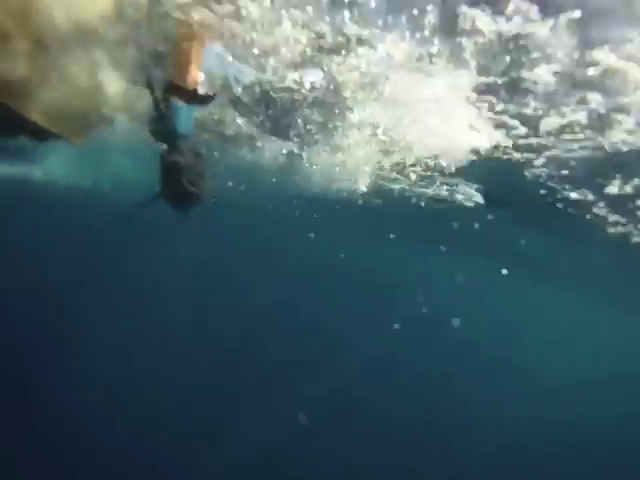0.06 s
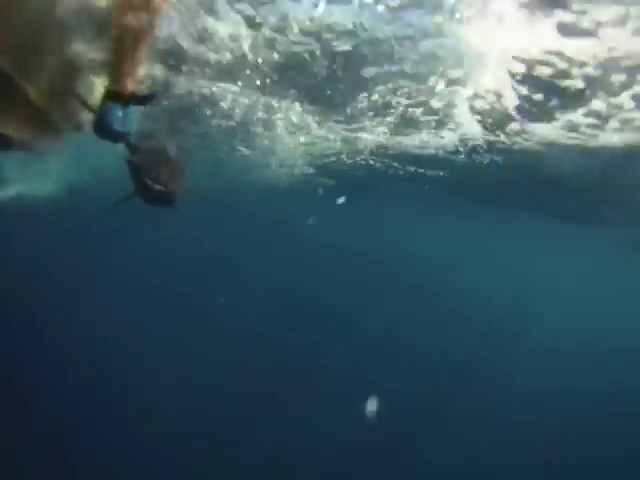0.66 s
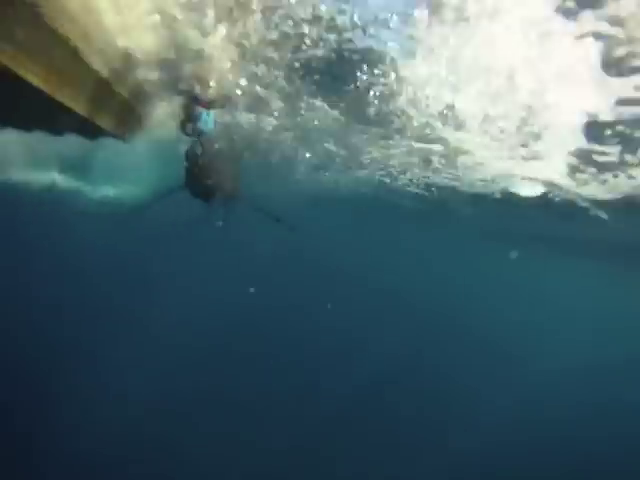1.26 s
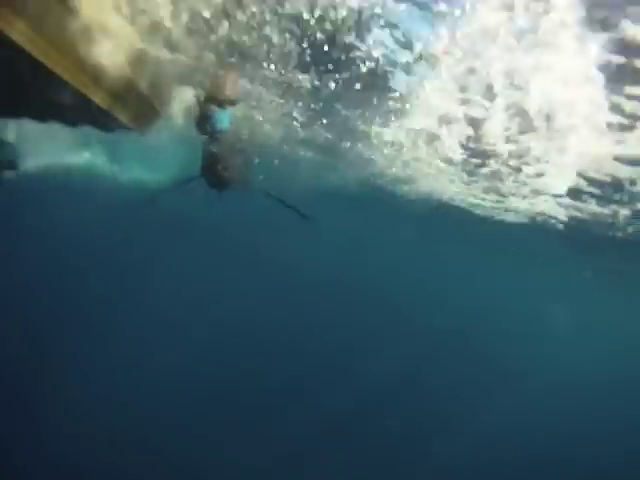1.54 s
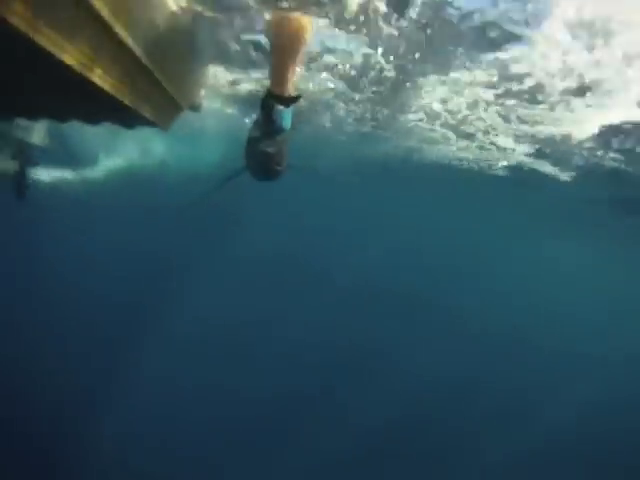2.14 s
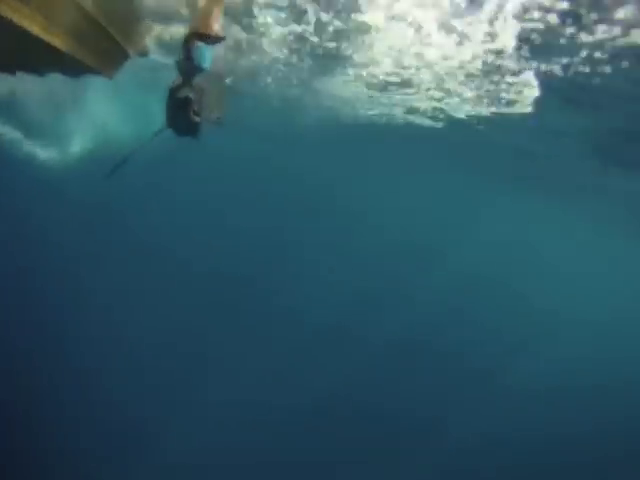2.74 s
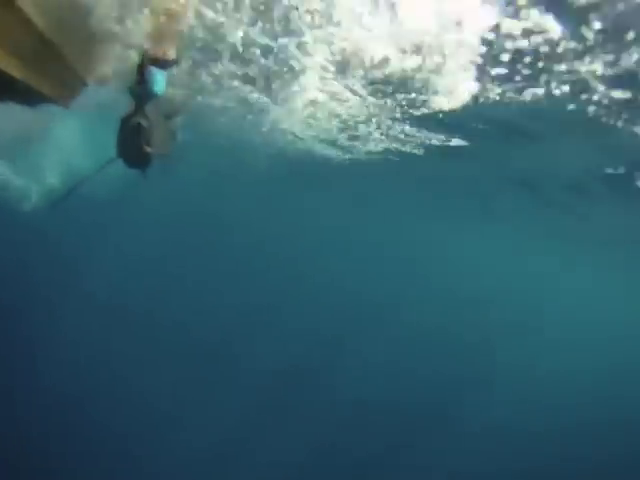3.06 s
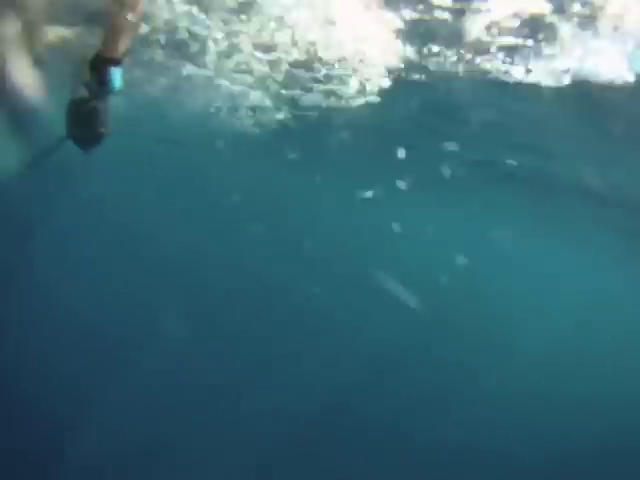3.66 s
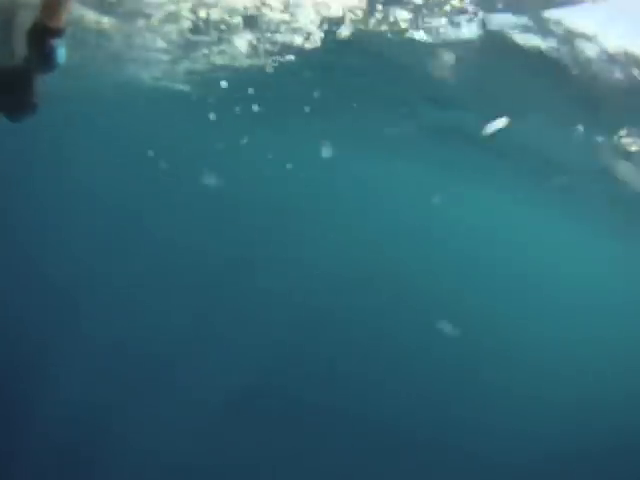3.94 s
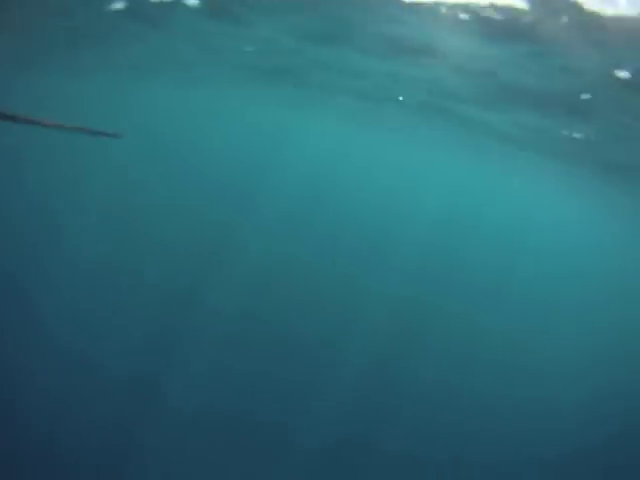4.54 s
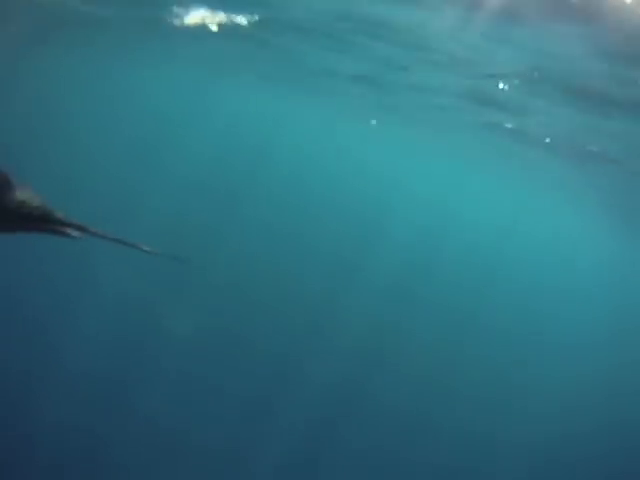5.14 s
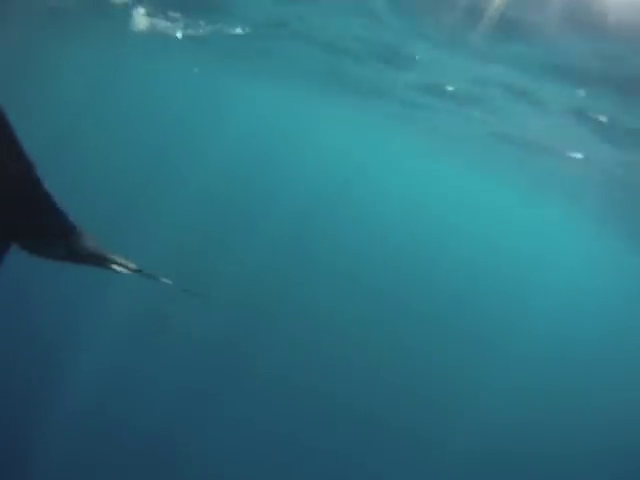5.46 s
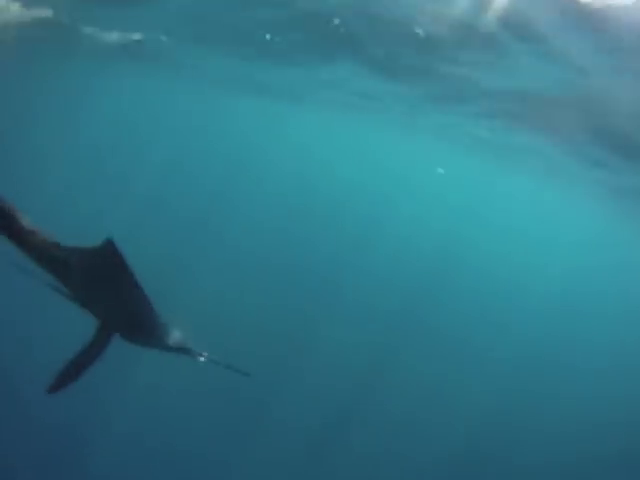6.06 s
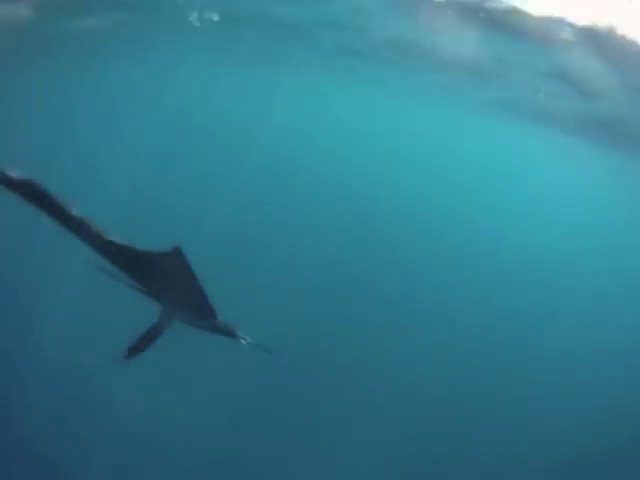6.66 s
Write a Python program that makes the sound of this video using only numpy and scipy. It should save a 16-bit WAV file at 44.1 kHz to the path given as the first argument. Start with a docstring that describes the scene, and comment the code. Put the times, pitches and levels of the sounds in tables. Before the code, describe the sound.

The sound is heard under water beside a moving boat, close and muffled by a camera housing. A continuous gurgle of churned bubbles with a thin fizz runs over a low, wavering engine throb and the rumble of streaming water. The first 0.6 seconds are the busiest, with bright froth, sharp crackles, small pings and several round bloops from large air pockets. The bubbling then eases, with a few more bloops between 1 and 1.6 seconds and a calmer stretch until about 2.8. The engine booms slightly near 0.9, 2 and 2.9 seconds. A run of bloops follows from 2.8 to 4 seconds, and the gurgle surges at 3.5. From 4 seconds everything gradually fades, with a strong bloop and crackles near 4.8, a brief swell with a sharp ping at 5.6, and faint last bloops before silence at about 6.7 seconds.

```python
"""A churn of bubbles, heard under water beside a moving boat. Each bubble is a resonator, a spring of air
loaded by water: the wake gurgles and froths, small bubbles ping and crackle near the camera housing,
and large air pockets bloop over the throb of the engine and the rumble of the stream.
The camera ducks after each big bloop and holds its samples at a low rate, which adds a thin fizz on top;
the sound fades out at the end."""
import sys
import numpy as np
from scipy import signal
from scipy.fft import rfft, irfft
from scipy.io import wavfile

SR = 44100
rng = np.random.default_rng(int(sys.argv[2]) if len(sys.argv) > 2 else 0)


def log_audio(samples):
    """Write samples as a 16-bit WAV file to the path given in sys.argv[1]."""
    # one column per channel
    frames = np.atleast_2d(samples).T
    # limit to full scale, then quantise
    limited = np.clip(frames, -1, 1)
    pcm = np.round(limited * 32767).astype(np.int16)
    wavfile.write(sys.argv[1], SR, pcm)


N = 299791
TIME = np.arange(N) / SR

# the wake swells and eases: t/s, gurgle level/dB, froth level/dB
WAKE_LEVELS = [(0.0, -16, -21), (0.1, -19.5, -18.5), (0.33, -19, -28), (0.7, -22, -29.5), (1.1, -25, -35),
               (1.6, -27.5, -34), (1.8, -24.5, -34), (2.3, -25, -32), (2.8, -25.5, -32.5),
               (3.3, -23, -32.5), (3.52, -16, -28.5), (3.63, -23.5, -31.5), (3.72, -21, -28),
               (4.3, -21.5, -33.5), (5.3, -27, -33.5), (5.6, -19.5, -27), (5.75, -23.5, -35),
               (6.5, -23.5, -33)]


def gain_of(db):
    """Amplitude ratio: a factor of ten for every 20 dB."""
    return 10 ** (np.asarray(db) / 20)


def unit_rms(x):
    """Normalisation to a mean square of 1."""
    return x / np.sqrt(np.mean(x ** 2) + 1e-20)


def curve(rows, column):
    """Linear interpolation of one column of a time table, at every sample."""
    rows = np.asarray(rows)
    return np.interp(TIME, rows[:, 0], rows[:, column])


def add(mix, start_s, sound):
    """Superposition: a sound adds to the mix from start_s on."""
    part = mix[max(round(start_s * SR), 0):][:len(sound)]
    part += sound[:len(part)]


def wander(rate_hz):
    """Random fluctuation of rms 1: noise low-passed at rate_hz."""
    hz = np.fft.rfftfreq(N, 1 / SR)
    return unit_rms(irfft(rfft(rng.standard_normal(N)) / (1 + (hz / rate_hz) ** 4), N))


def coloured(x, spectrum, size=2 ** 13):
    """Minimum-phase filtering imposes a spectral shape; the result has rms 1."""
    hz, db = np.transpose(spectrum)
    bin_hz = abs(np.fft.fftfreq(size, 1 / SR))
    log_gain = np.log(gain_of(np.interp(np.log(bin_hz + 1), np.log(hz), db)))
    response = np.exp(np.conj(signal.hilbert(log_gain)))
    taps = np.fft.ifft(response).real[:size // 2]
    return unit_rms(signal.oaconvolve(x, taps)[:N])


def bubble(hz, t60_s, rise_s, glide):
    """Damped oscillator: a pocket of air rings, its pitch climbing as it nears the surface."""
    t = np.arange(0, t60_s + rise_s, 1 / SR)
    swell = np.sin(np.pi / 2 * np.minimum(t / rise_s, 1)) ** 2
    decay = np.exp(-np.log(1000) * np.maximum(t - rise_s, 0) / t60_s)
    return swell * decay * np.sin(2 * np.pi * hz * t * (1 + glide * t / t60_s))


def swarm(low_hz, high_hz, per_s, cycles, spread_db, glide, sizes):
    """Shot noise: bubbles of many sizes are born at random moments, most faint, a few strong."""
    out = np.zeros(N)
    for hz in np.linspace(low_hz, high_hz, sizes):
        ring = bubble(hz, cycles * rng.uniform(0.5, 3.43) / hz, 1 / hz, glide)
        strength = gain_of(spread_db * np.minimum(rng.exponential(1, N), 4))
        births = strength * (rng.random(N) < per_s / sizes / SR)
        out += signal.oaconvolve(births, ring / np.linalg.norm(ring))[:N]
    return out


def rumble(level_db=-27.5, eddy_db=2.5, eddy_hz=2.7):
    """Flow noise: the pressure fluctuates as water streams past the housing in eddies."""
    # the stream heard through the housing: f/Hz, relative level/dB
    flow_spectrum = [(8, -49), (20, 9.5), (40, 4.5), (90, 5.5), (125, -1.5), (165, -8.5), (260, -12),
                     (400, -48.5)]
    flow = coloured(rng.standard_normal(N), flow_spectrum)
    return flow * gain_of(level_db + eddy_db * wander(eddy_hz))


def engine(sway_db=2.5, sway_hz=4):
    """Periodic firing gives a harmonic series: three strong low orders, weaker ones wavering above."""
    # firing rate: t/s, f/Hz
    firing_rate = [(0.0, 36.3), (0.05, 36.99), (2.89, 35.46), (2.96, 36.24), (4.71, 36.54), (5.11, 37.54),
                   (6.26, 35.23), (6.4, 35.7)]
    # two orders boom and recede as the hull rolls: t/s, order 2 rms level/dB, order 3 rms level/dB
    booming_orders = [(0.3, -34.5, -31.5), (0.85, -23, -19), (1.3, -28.5, -30.5), (1.8, -39, -34.5),
                      (2.05, -37, -21), (2.5, -28, -25.5), (2.88, -32, -17.5), (3.05, -27, -41.5),
                      (3.7, -26, -27.5), (5.1, -25, -31), (5.9, -34, -30.5), (6.5, -32, -24.5)]
    # the others sway at random: multiple of the firing rate, rms level/dB
    swaying_orders = [(1, -28.5), (4, -45.5), (5, -53.5), (6, -48.5), (7, -48), (8, -43.5), (9, -38),
                      (10, -34), (11, -40), (12, -45)]
    firing_hz = curve(firing_rate, column=1) * (1 + 0.00384 * wander(5.56))
    firings = np.cumsum(firing_hz) / SR
    levels = [(order, curve(booming_orders, column=order - 1)) for order in (2, 3)]
    levels += [(order, db + sway_db * wander(sway_hz)) for order, db in swaying_orders]
    out = np.zeros(N)
    for order, db in levels:
        drift = 0.01 * order * wander(8.1)  # bubble clouds keep changing the path through the water
        phase = 2 * np.pi * (order * firings + drift + rng.random())
        out += np.sqrt(2) * gain_of(db) * np.sin(phase)
    return out


def gurgle(gulp_db=1.64):
    """Large bubbles resonate low; the wake sheds them in gulps that modulate the level."""
    # large bubbles heard through the housing: f/Hz, relative level/dB
    gurgle_spectrum = [(150, -28.5), (250, -16), (330, -4), (420, -2.5), (600, 1), (690, -6.5), (770, -2),
                       (870, -16), (1000, -19), (1300, -43.5)]
    bubbles = swarm(235.3, 893.2, per_s=900, cycles=19, spread_db=3.5, glide=0.071, sizes=36)
    gulps = unit_rms(gain_of(gulp_db * wander(25)))
    return coloured(bubbles, gurgle_spectrum) * gulps * gain_of(curve(WAKE_LEVELS, column=1))


def froth(clump_db=2.43):
    """Small bubbles resonate high, in quick clumps; harder churning also whips up a fine spray."""
    # white water heard through the housing: f/Hz, relative level/dB
    froth_spectrum = [(700, -41.5), (990, -9.5), (1170, 5), (1370, -7.5), (1490, -1.5), (1620, -7),
                      (1820, -3), (2330, 1), (2750, -14.5), (3250, -26), (3750, -20), (4400, -31.5),
                      (5400, -34), (6000, -38)]
    # ticks and spray heard through the housing: f/Hz, relative level/dB
    fine_spectrum = [(2500, -19.5), (3600, 3.5), (4400, -11.5), (5300, -7.5), (6000, -12.5)]
    level_db = curve(WAKE_LEVELS, column=2)
    bubbles = swarm(893.7, 5760, per_s=5000, cycles=30, spread_db=4.5, glide=0.02, sizes=64)
    ticks = swarm(2700, 5700, per_s=56, cycles=32, spread_db=3.3, glide=0.051, sizes=20)
    spray = swarm(2400, 4600, per_s=990, cycles=36, spread_db=4.5, glide=0.03, sizes=24)
    clumps = unit_rms(gain_of(clump_db * wander(25)))
    white_water = coloured(bubbles, froth_spectrum) * clumps
    spray_gain = gain_of(-28 + np.minimum(0.38 * (level_db - np.median(level_db)), 11))
    fine = gain_of(-21) * coloured(ticks, fine_spectrum) + spray_gain * coloured(spray, fine_spectrum)
    return (white_water + fine) * gain_of(level_db)


def pings(cycles=55, stray_vs_froth_db=-10.5):
    """Light damping lets small bubbles ring for dozens of cycles: faint strays, and a few close by."""
    # single close bubbles: t/s, peak level/dB, f/Hz
    close_bubbles = [(0.013, -6.5, 1780), (0.046, -10.5, 1360), (0.052, -8, 1990), (0.564, -8.5, 2085),
                     (1.791, -14.5, 1210), (2.321, -13, 1187), (3.053, -14.5, 1110), (3.848, -12, 2285),
                     (5.609, -2.5, 2120)]
    strays = swarm(1100, 2800, per_s=30, cycles=cycles, spread_db=6, glide=0.091, sizes=24)
    out = unit_rms(strays) * gain_of(stray_vs_froth_db + curve(WAKE_LEVELS, column=2))
    for s, db, hz in close_bubbles:
        add(out, s - 0.001, gain_of(db) * bubble(hz, cycles / hz, rise_s=0.002, glide=0.039))
    return out


def crackles(window_s=0.006, scatter_octaves=0.31, cycles=20, count=9):
    """Tiny bubbles of scattered pitch, born within milliseconds, superpose into one sharp transient."""
    # bursts close to the housing: t/s, level/dB, centre f/Hz
    bursts = [(0.05, -11, 1900), (0.068, -16, 3260), (0.087, -4, 2120), (0.106, -7, 3100),
              (0.227, -7, 2200), (0.490, -6.5, 2510), (0.567, -9, 2000), (1.59, -12.5, 2510),
              (1.689, -20, 2880), (3.36, -18.5, 2890), (3.528, -11, 2100), (3.712, -16, 2160),
              (4.2, -13.5, 2300), (4.721, -5, 2290), (4.740, -12.5, 2400), (4.816, -6.5, 1309),
              (4.939, -16.5, 2820), (5.202, -16, 3042), (5.323, -15, 2530), (5.593, -2, 2142),
              (5.802, -8.5, 3200), (6.145, -18.5, 2520), (6.265, -23, 3220)]
    out = np.zeros(N)
    for s, db, centre_hz in bursts:
        for octaves in np.linspace(-1.5, 1.5, count) * scatter_octaves:
            hz = centre_hz * 2 ** octaves
            pop = bubble(hz * rng.uniform(0.948, 1.016), cycles / hz, rise_s=1 / hz, glide=0.048)
            weight = np.exp(-(octaves / scatter_octaves) ** 2 / 2) / np.sqrt(count / 2)
            add(out, s - 0.001 + window_s * rng.random(), gain_of(db) * weight * pop)
    return out


def bloops(rise_s=0.00314, muffle_hz=900):
    """Pinch-off excites the volume resonance of a large air pocket; the housing acts as a low-pass."""
    # large air pockets: t/s, peak level before muffling/dB, f/Hz
    pockets = [(0.135, -6.5, 553), (0.211, -0.5, 550), (0.344, 3.5, 575), (0.4505, 0.5, 467),
               (0.4555, -3, 402), (1.061, -5, 588), (1.123, -11, 526), (1.249, 1, 537), (1.418, -7, 560),
               (1.605, -9, 750), (2.236, -10, 594), (2.808, -6.5, 528), (2.881, -12, 697),
               (2.943, -8.5, 734), (2.98, -9.5, 642), (3.078, 1.5, 617), (3.179, -1, 556), (3.346, -7, 550),
               (3.4465, -7.5, 606), (3.564, -6, 562), (3.8385, -11, 592), (3.856, -2, 540),
               (3.973, 2.5, 599), (4.0574, -11.5, 549), (4.3685, -0.5, 418), (4.770, 5.5, 560),
               (5.225, 0.7, 716), (5.834, -0.5, 526), (5.950, 1, 586), (6.129, -7, 515), (6.428, -0.5, 627)]
    quiver_db, quiver_s = -19, 0.00914  # the pocket quivers as its neck narrows
    shed_count, shed_db, shed_window_s, shed_octaves = 4, -19.5, 0.029, 0.2  # bubbles torn off it
    out = np.zeros(N)
    for s, db, hz in pockets:
        quiver = bubble(hz, t60_s=0.03, rise_s=quiver_s, glide=0.011)
        add(out, s - quiver_s - 0.002, gain_of(db + quiver_db) * quiver)
        ring = bubble(hz, t60_s=0.043, rise_s=rise_s, glide=0.014)
        add(out, s - 0.001, gain_of(db) * ring)
        for when, pitch in rng.random((shed_count, 2)):
            shed_hz = hz * 2 ** (shed_octaves * (2 * pitch - 1))
            shed = bubble(shed_hz, t60_s=0.053, rise_s=rise_s, glide=0.043)
            add(out, s + rise_s + shed_window_s * when, gain_of(db + shed_db) * shed)
    return signal.sosfiltfilt(signal.butter(6, muffle_hz, fs=SR, output="sos"), out)


def scene():
    """The pressures of bubbles, engine and stream add linearly at one microphone."""
    return (gurgle() + froth() + bloops() + pings() + crackles() + engine() + rumble())[None]


def gain_control(x, threshold_db=-6.5, depth=1.09, recover_db_per_s=75, attack_s=0.0036):
    """Compression: peaks over the threshold pull the gain down within milliseconds; it creeps back."""
    peak_db = 20 * np.log10(abs(x) + 1e-9)
    fall_db = TIME * recover_db_per_s
    held_db = np.maximum.accumulate(peak_db + fall_db) - fall_db
    excess_db = np.maximum(held_db - threshold_db, 0)
    lag = np.exp(-1 / (attack_s * SR))
    cut_db = signal.lfilter([1 - lag], [1, -lag], depth * excess_db)
    return x * gain_of(-cut_db)


def sample_and_hold(x, hold_hz=12000, oversample=4):
    """Spectral imaging: stair steps at a low sample rate mirror the sound faintly around that rate."""
    steps = np.repeat(signal.resample_poly(x, hold_hz, SR), oversample)
    return signal.resample_poly(steps, SR, oversample * hold_hz)[:N]


def record(dry, ceiling=0.93, fade_start_s=3.99, silent_s=6.652, edge_hz=15200):
    """The camera's compression, saturation and coarse sampling; then a fade-out and a band limit."""
    x = gain_control(dry[0])
    # the first swings of a big bloop outrun the gain control and are flattened
    x = x / (1 + (x / ceiling) ** 16) ** (1 / 16)
    x = sample_and_hold(x) * np.interp(TIME, (fade_start_s, silent_s), (1, 0))
    band_limit = signal.firwin(191, edge_hz, window=("kaiser", 9), fs=SR)
    return signal.oaconvolve(x, band_limit, "same")[None]


dry = scene()
out = record(dry)
log_audio(out)
```